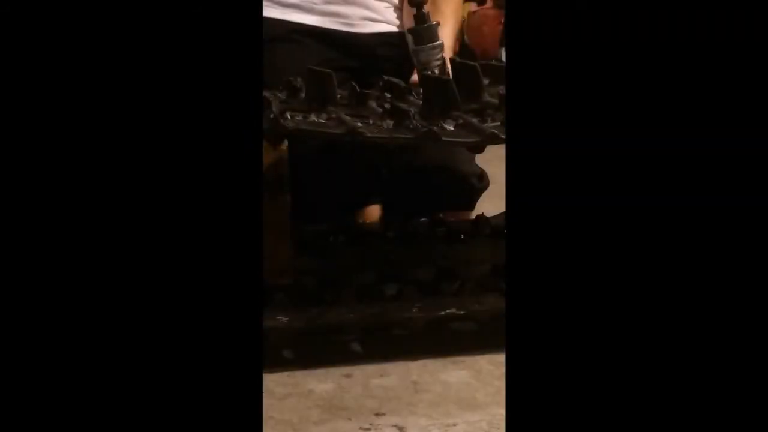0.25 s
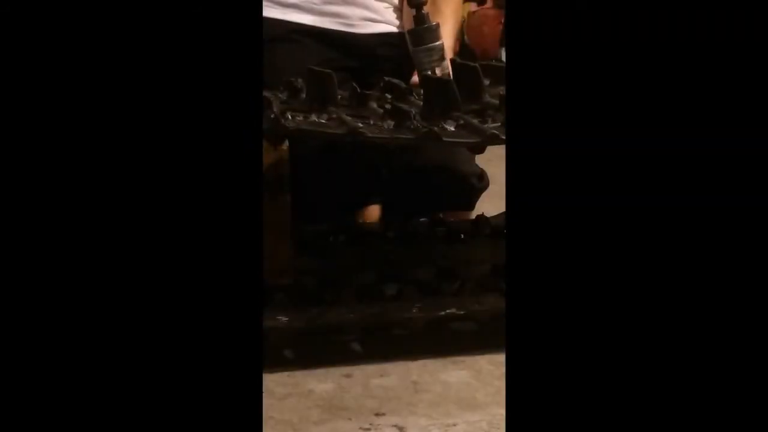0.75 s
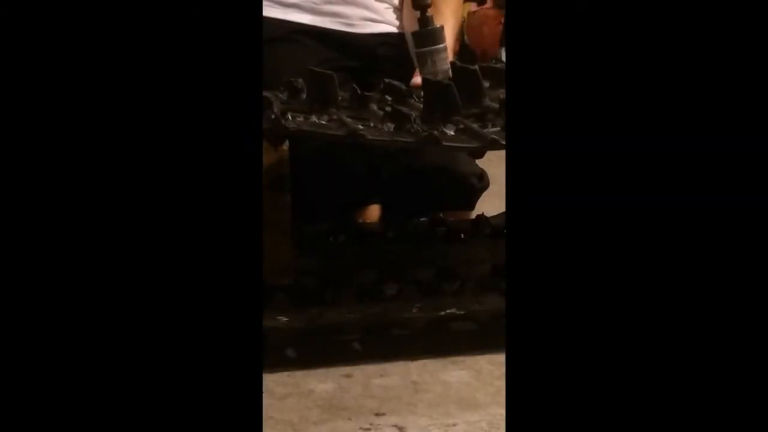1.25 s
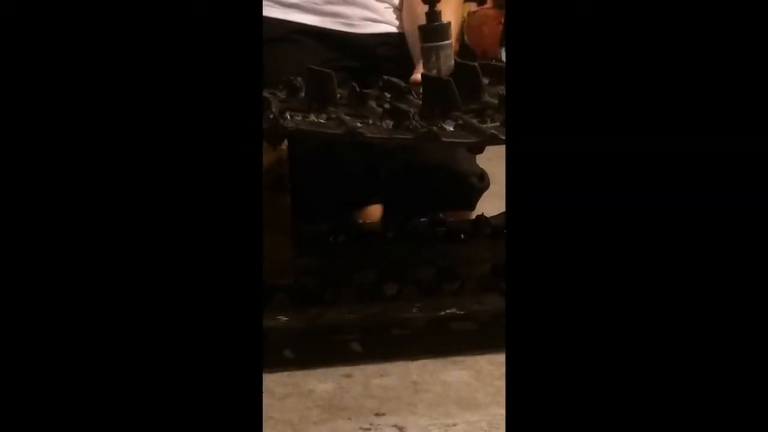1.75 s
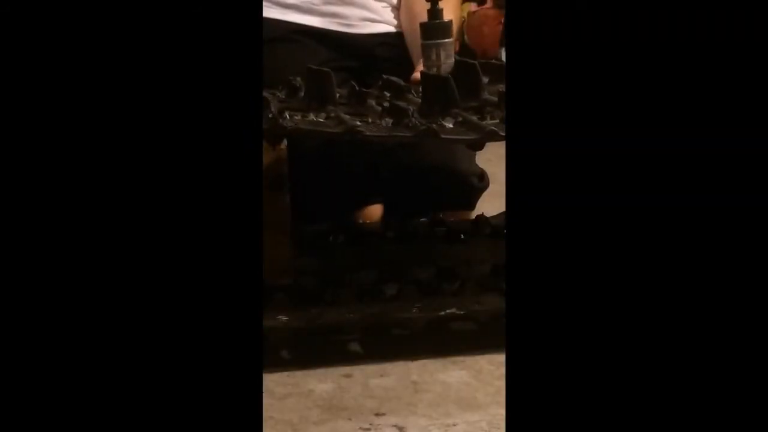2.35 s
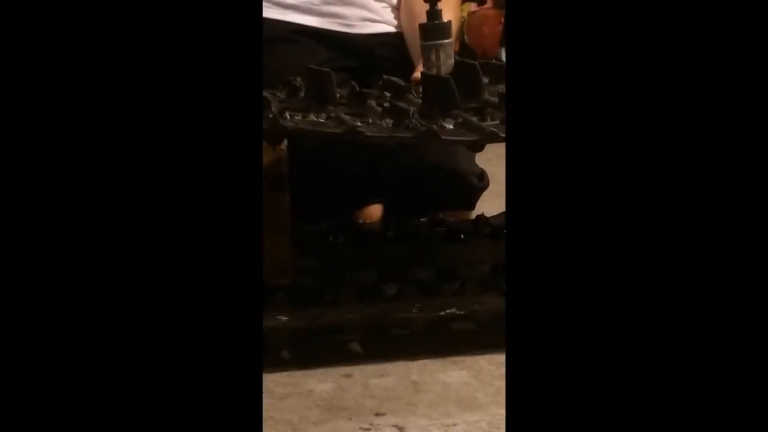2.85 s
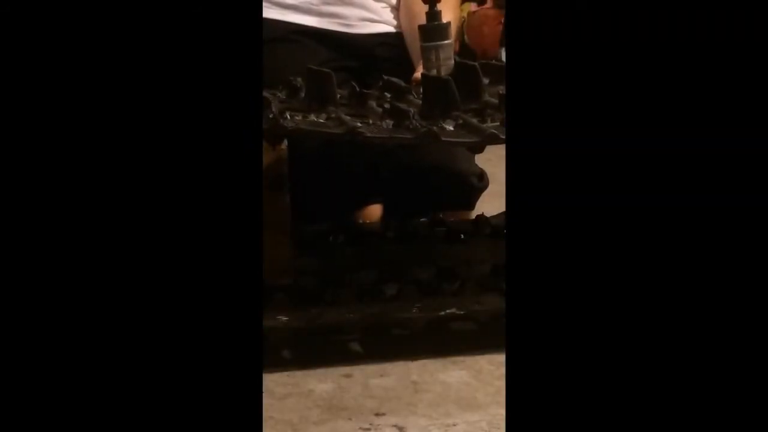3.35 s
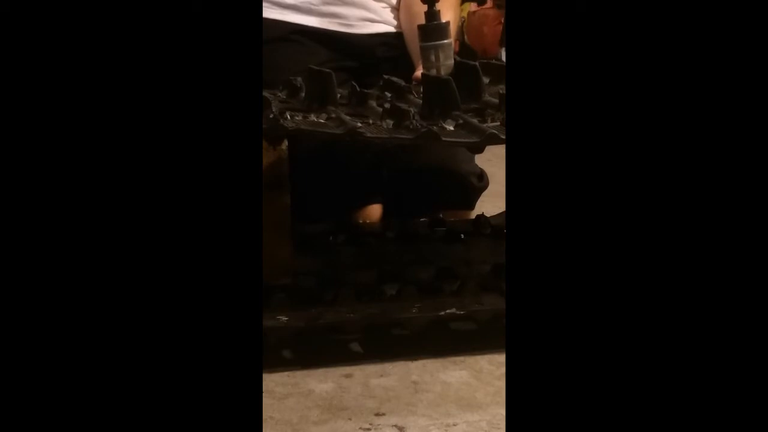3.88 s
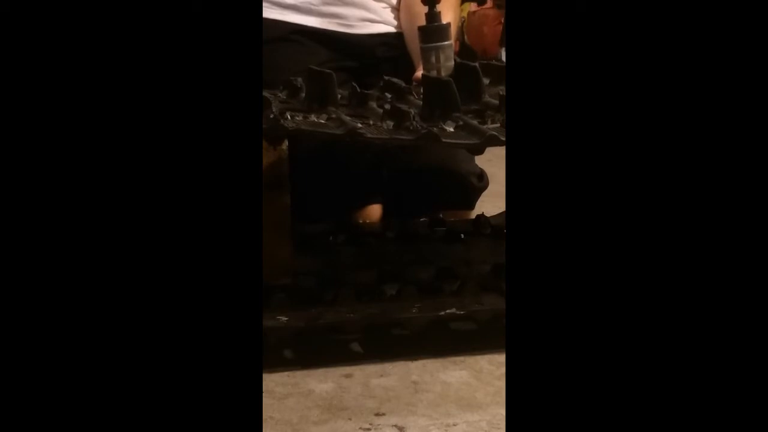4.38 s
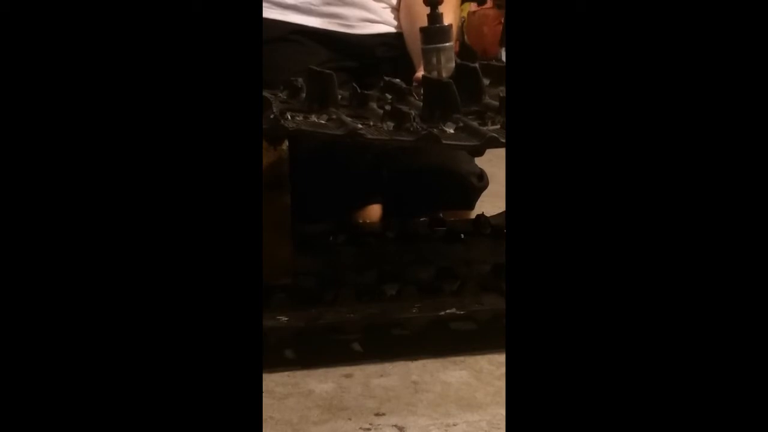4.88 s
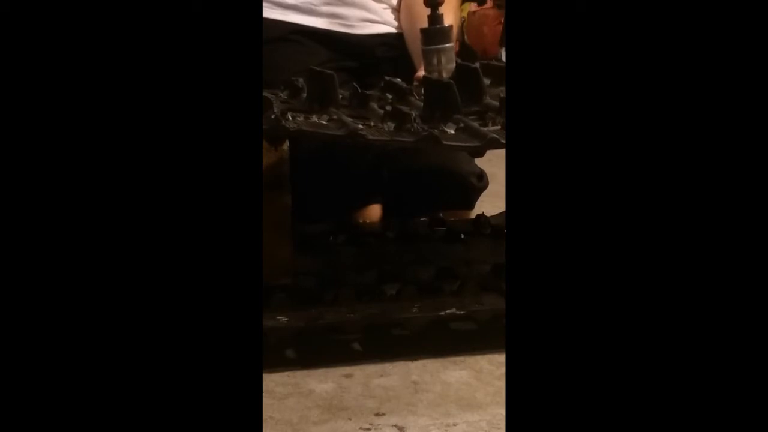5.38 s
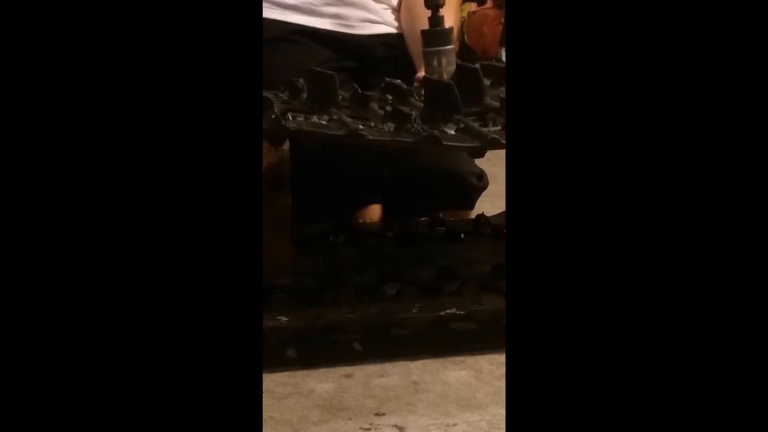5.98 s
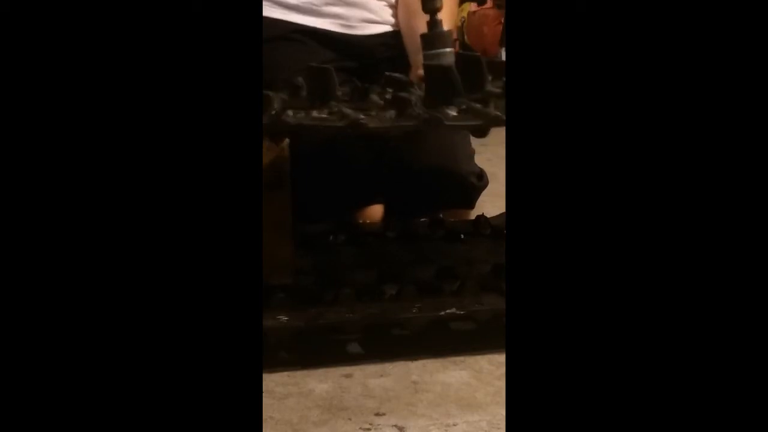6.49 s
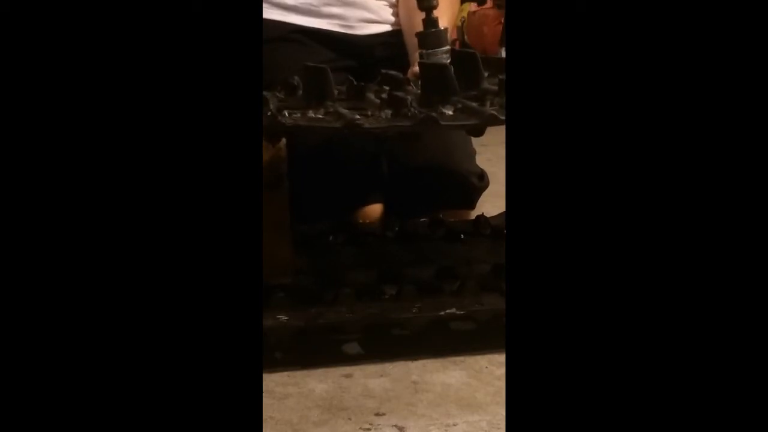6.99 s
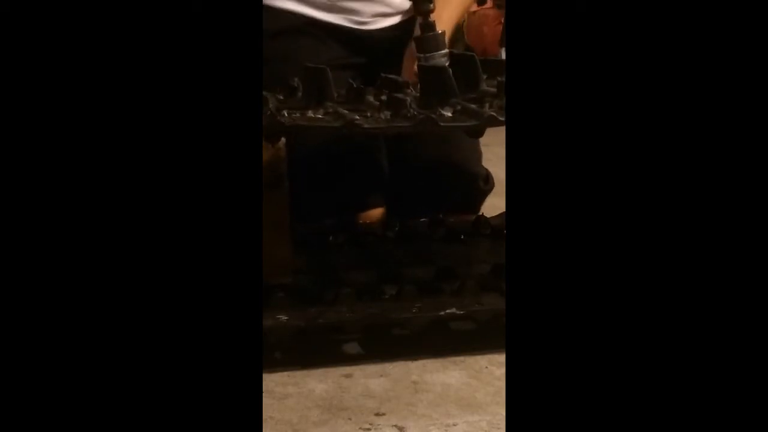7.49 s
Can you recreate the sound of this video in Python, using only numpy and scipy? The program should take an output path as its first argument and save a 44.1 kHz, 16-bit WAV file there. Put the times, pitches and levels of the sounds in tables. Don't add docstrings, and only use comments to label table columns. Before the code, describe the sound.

In a workshop, a low distant machine hum and insect-like hiss sit under a close drill, brighter on the left. From 0 to 0.6 s the motor barely turns, giving uneven dry gear jolts. From 0.6 to 2 s a rapid ratcheting, about sixty pulses a second, thickens as pitch climbs. From 2 to 5 s the chattering whine rises in steps, louder, with gear rattle, hissing brush sparks and short metallic rings as the saw teeth catch in thick rubber. About 5.2 s full trigger smooths the chatter and the motor surges into a fast, loud whine, sagging slightly from 5.9 s as the saw binds. At 6.4 s it cracks through; gears grind and groan downward, stopping by 7 s. Tiny ticks at 7.03 and 7.2 s, then at 7.6 s a bench clunk with a brief jingling steel ring.

```python
import sys
import numpy as np
from scipy import signal
from scipy.fft import rfft, irfft, next_fast_len
from scipy.io import wavfile
from scipy.ndimage import uniform_filter1d, map_coordinates

SR = 44100
rng = np.random.default_rng(int(sys.argv[2]) if len(sys.argv) > 2 else 0)


def to_linear_factor(level_db):
    exponent = np.asarray(level_db, float) / 20
    return 10 ** exponent


def wav_record(signal):
    frames = np.transpose(np.atleast_2d(signal))
    bounded = np.clip(frames, -1, 1)
    quanta = np.round(bounded * 32767).astype(np.int16)
    wavfile.write(sys.argv[1], SR, quanta)


N = 341025
T = np.arange(N) / SR
MAINS_HZ = 60.08


def unit(x):
    return x / np.sqrt(np.mean(x ** 2) + 1e-20)


def along(points, hz):
    f, v = np.transpose(points)
    return np.interp(np.log(hz + 1), np.log(f + 1), v)


def curves(rows):
    s, *cols = np.transpose(rows)
    return [np.interp(T, s, c) for c in cols]


def wobble(rate):
    knots = rng.standard_normal(int(N * rate / SR) + 4)
    return map_coordinates(knots, [np.arange(N) * rate / SR])


def bumps(rows, span):
    t = np.arange(0, N / SR + .01, .005)
    swell = sum(size * np.exp(-((t - s) / span) ** 2) for s, size in rows)
    return curves(np.transpose([t, swell]))[0]


def swell_db(s, span):
    return -9 * ((T - s) / span) ** 2


def filtered(x, response):
    m = next_fast_len(N + SR // 2)
    return irfft(rfft(x, m) * response(np.fft.rfftfreq(m, 1 / SR)), m)[..., :N]


def modes(table):
    return lambda f: sum((-1) ** k * to_linear_factor(db) * 1j * f * w / (c * c - f * f + 1j * f * w)
                         for k, (c, w, db) in enumerate(table))


def tone(phase, db):
    return np.sqrt(2) * to_linear_factor(db + .8 * wobble(10)) * np.sin(phase + 6 * rng.random())


def wandering(hz):
    return 2 * np.pi * np.cumsum(hz) / SR


LULL_TIMES = (3.95, 4.5, 5.9, 6.15)
# (time [s], level [dB])
SURGES = [
    (.54, 1),
    (1.15, 3),
    (2.1, -7),
    (3.64, -3),
    (4.24, 4),
    (6.82, 3),
    (7.34, 5.5),
]


def drone_db():
    surge_db = bumps(SURGES, .07) + wobble(2)
    return surge_db, np.interp(T, LULL_TIMES, [0, -11, -11, 0])


# (frequency [Hz], width [Hz], level [dB])
HUM = [(48.8, 7.3, -56), (74, 37, -57), (104, 11, -56), (227, 10, -75.5), (5270, 130, -61),
       (4750, 400, -67.5), (30, 20, -71.5)]
# (frequency [Hz], level [dB])
MACHINE = [(49, -57), (106.4, -61)]
# (frequency [Hz], level [dB per Hz])
HISS = [(76, -34.5), (130, -11.5), (162, -11), (211, -15.5), (1170, -26), (4070, -31), (5180, -23.5),
        (5730, -32.5), (16000, -35.5)]


def floor():
    shared, own = rng.standard_normal(N), rng.standard_normal((2, N))
    hum = lambda f: sum(to_linear_factor(db) / np.sqrt(w) / (1 + ((f - c) / w * 2) ** 2) for c, w, db in HUM)
    alike = lambda f: 1 / (1 + (f / 350) ** 2)
    mixed = filtered(shared, alike) + filtered(own, lambda f: np.sqrt(1 - .96 * alike(f) ** 2))
    drone = to_linear_factor(40.5) * filtered(mixed, hum) * to_linear_factor([[1.2], [-1.2]])
    steady = sum(np.sqrt(2) * to_linear_factor(db + 1.3 * wobble(3.5)) * np.sin(wandering(hz + 0.82 * wobble(6.4)))
                 for hz, db in MACHINE)
    drone = drone + steady * to_linear_factor([[1.4], [-1.4]])
    for change_db, below_hz in zip(drone_db(), (150, 66)):
        drone = drone + (to_linear_factor(change_db) - 1) * filtered(drone, lambda f: f < below_hz)
    hiss = unit(filtered(rng.standard_normal((2, N)), lambda f: to_linear_factor(along(HISS, f))))
    return drone + to_linear_factor(-60.0) * hiss


# (frequency [Hz], t60 [s])
ROOM = [(200, 1), (600, 0.4), (2000, 0.48), (8000, 0.35), (15000, 0.42)]


def room(x):
    hz, t, z = signal.stft(rng.standard_normal((2, SR // 2)), SR, nperseg=256)
    tail = signal.istft(z * to_linear_factor(-60 * t / along(ROOM, hz)[:, None]), SR, nperseg=256)[1]
    tail = tail / np.linalg.norm(tail[0])
    return signal.fftconvolve(np.pad(x, (700, 0))[None], tail, axes=1)[:, :N]


# (time [s], peak level [dB], thud [dB], tick [dB], t60 [s])
KNOCKS = [
    (6.418, -13.5, -19, -18, 0.045),
    (7.031, -47.5, -16, -7.5, 0.022),
    (7.199, -53, -17, -17, .043),
    (7.618, -39, -9, -34, 0.034),
    (7.6235, -31.5, -22, -16.5, 0.036),
    (7.635, -33, -14.5, -16.5, 0.041),
]
# (time [s], level [dB])
CLACKS = [
    (6.4171, -3),
    (7.6272, -18.5),
    (7.634, -27),
]
# (frequency [Hz], width [Hz], level [dB])
BENCH = [(900, 900, -2), (1800, 450, 1), (2700, 1300, 0), (4500, 2500, -12)]
# (frequency [Hz], width [Hz], level [dB])
FITTINGS = [(5320, 500, -9), (6900, 500, -2), (8060, 200, -5), (8780, 60, -4), (11000, 3000, -11)]
# (frequency [Hz], width [Hz], level [dB])
HOUSING = [(2450, 420, 0), (3350, 500, 0)]


def knocks():
    crack, tick, thud = np.zeros(N + SR), np.zeros(N + SR), np.zeros(N)
    t = np.arange(SR // 8) / SR
    for s, db, thud_db, tick_db, t60 in KNOCKS:
        shape = (1 - np.exp(-t / 0.00051)) * to_linear_factor(db - 60 * t / max(t60, .005))
        burst = shape * rng.standard_normal((2, len(t)))
        start = round(s * SR)
        crack[start:][:len(t)] += burst[0]
        tick[start:][:len(t)] += to_linear_factor(tick_db) * burst[1]
        thud[start] = to_linear_factor(db + thud_db + 47.0)
    ring = to_linear_factor(12.5) * filtered(crack[:N], modes(BENCH)) + to_linear_factor(26.5) * filtered(tick[:N], modes(FITTINGS))
    edges = np.bincount([round(s * SR) for s, db in CLACKS], [to_linear_factor(db + 23.0) for s, db in CLACKS], N)
    heavy = modes([(129, 20, -7.5), (262, 36.0, 6.0), (350.0, 24, 9.0), (594, 200, -8)])
    return ring + filtered(edges, modes(HOUSING)) + filtered(thud, heavy)


# (frequency [Hz], level [dB], t60 [s])
CHUCK = [(1823, -2.5, .12), (1960, -4.5, .35), (2541, -10, .31), (2794, -10.5, .23), (8010, -8, .07),
         (8800, -19, .3)]


def chuck():
    out, t = np.zeros(N + SR), np.arange(SR // 4) / SR
    for s, db in CLACKS[1:]:
        for hz, level, t60 in CHUCK:
            phase = 2 * np.pi * hz * t + rng.normal(0, .04, len(t)).cumsum()
            out[round(s * SR):][:len(t)] += to_linear_factor(db - 17 + level - 60 * t / t60) * np.sin(phase)
    return out[:N]


def mains():
    return 2 * np.pi * (MAINS_HZ * T - .6)


FULL_S, THROUGH_S = 5.24, 6.41
# (time [s], speed [turns Hz])
SPEED = [(0, 20), (.5, 38), (.69, 52), (.86, 60), (.96, 72), (1.29, 95), (1.9, 123), (2.1, 153.3),
         (2.28, 165), (2.42, 165.7), (2.58, 178), (2.9, 186), (3.6, 191), (3.7, 207), (3.87, 224),
         (4.25, 237), (4.6, 241.2), (5.02, 241.3), (5.12, 252.5), (5.24, 266)]
# (time [s], speed [turns Hz])
BRAKING = [(6.4, 333), (6.42, 322), (6.45, 283), (6.48, 256), (6.51, 240), (6.56, 227), (6.63, 235.5),
           (6.685, 240.5), (6.705, 228), (6.73, 204), (6.79, 156), (6.9, 60)]


def speed():
    full = 351.5 - (351.5 - SPEED[-1][1]) * np.exp(-(T - FULL_S) / .15)
    full = full - 62 * np.clip(T - 5.9, 0, 1) ** 2
    running = np.where(T < BRAKING[0][0], full, curves(BRAKING)[0])
    return np.where(T < FULL_S, curves(SPEED)[0], running)


def stages():
    braked = np.clip((T - THROUGH_S) / .04 + .5, 0, 1)
    return np.clip((T - FULL_S + .07) / .2, 0, 1) * (1 - braked), braked


# (time [s], level [dB])
EFFORT = [(0, -48.5), (.2, -49.5), (.41, -44.5), (.49, -50), (.58, -41), (.8, -37), (1.6, -35), (2.5, -31),
          (3.65, -30.5), (3.84, -28), (5.05, -26.5), (5.28, -24), (6.06, -21.5), (6.41, -22.5),
          (6.45, -25.5), (6.69, -25), (6.82, -32), (7.0, -65)]
# (time [s], peak level [dB], body level [dB])
JOLTS = [(0.0734, -34.5, 4.5), (0.0939, -32, 0), (0.11, -34.5, -0.5), (.124, -43, 7), (.16, -38, 4.5),
         (.176, -35, 3.5), (0.1923, -30.5, -1), (0.21, -29, 0.5), (.244, -29.5, -2), (0.2572, -28, 1.5),
         (0.291, -33.5, -3), (0.311, -31.5, -1), (0.361, -34, 1.5), (0.392, -27, -2.5), (.41, -22.5, -6.5),
         (.444, -38.5, 3), (.476, -37, 1), (0.5279, -30.5, 1.5), (0.5445, -26.5, -0.5),
         (0.5567, -24.5, -3.5), (.577, -29.5, -1), (0.5936, -23, -12), (0.627, -29.5, -3.5),
         (0.656, -26, 0), (.676, -24.5, -15), (0.694, -26, -2.5), (0.726, -20, -8), (0.742, -20, -5),
         (0.7736, -19.5, -8), (.792, -24.5, -3.5), (.8258, -24, -5.5), (0.843, -22, -5.5),
         (0.8918, -23, -17), (.9393, -34, -7.5), (.908, -25, -5.5), (1.055, -29.5, -2.5),
         (1.0888, -26.5, -15), (1.177, -20.5, -7.5), (1.2074, -27, -1.5), (1.2437, -25, -8),
         (1.2758, -25, -6), (1.327, -25.5, -6), (1.37, -23.5, -5.5), (1.544, -23.5, -2.5)]


def jolts():
    bright, body, t = np.zeros(N), np.zeros(N), np.arange(SR // 30) / SR
    pulses = (np.arange(int(.6 * MAINS_HZ), int(2.05 * MAINS_HZ)) + .55) / MAINS_HZ
    sizes = np.interp(pulses, *zip(*EFFORT)) + 0.5 + 1.5 * rng.standard_normal(len(pulses))
    ratchet = [(s, db, 1.5) for s, db in zip(pulses, sizes)]
    for s, db, body_db in list(JOLTS) + ratchet:
        decay = to_linear_factor(db - 60 * t / 0.027) + to_linear_factor(db + 2.5 - 60 * t / 0.0054)
        burst = (1 - np.exp(-t / 0.00087)) * decay * np.sign(rng.standard_normal((2, len(t))))
        start = round(s * SR)
        bright[start:][:len(t)] += burst[0]
        body[start:][:len(t)] += to_linear_factor(body_db - 3.5) * burst[1]
        body[round((s + .001) * SR)] += to_linear_factor(db + body_db + 11.5)
    sparks = to_linear_factor(4.0) * filtered(bright, lambda f: modes([(7500, 7000, 0)])(f) ** 2)
    gearbox = modes([(513, 460, -10.0), (1200, 340, -1.0), (2490, 1000, -2.0), (3050, 560, 2.0),
                     (3640, 32, -7.5)])
    return sparks + to_linear_factor(15.5) * filtered(body, gearbox)


def throb():
    hz, (full, braked) = speed(), stages()
    depth_db = (1 - braked) * 13 * np.exp(-hz / 110) - full
    depth_db = depth_db * np.interp(T, [.05, .1, .55, .62], [0, .5, .5, 1])
    pulse = np.exp(1.5 * (np.cos(mains() + 0.68 * np.cos(mains())) - 1))
    pulse = pulse * (1 + 0.3 * wobble(60))
    beat_db = 1.54 * depth_db * (pulse - pulse.mean()) + 0.4 * np.sin(wandering(hz))
    shared_db = 0.32 * wobble(11.0) + 0.21 * wobble(35)
    return beat_db, shared_db, 1.5 * (1 - full)


def rattle(depth, throbbing, response):
    beat_db, shared_db, grain_db = throbbing
    gain = to_linear_factor(depth * beat_db + shared_db + grain_db * wobble(900) + 0.88 * wobble(40))
    noise = rng.standard_normal(N) * gain / np.sqrt(np.abs(uniform_filter1d(gain ** 2, size=8000)))
    return unit(filtered(noise, response))


# (frequency [Hz], width [Hz], level [dB])
FAN = [(6580, 450, 10.5), (7970, 160, 10), (9040, 290, -3.5), (10600, 500, -18.5)]


def fan(throbbing):
    return to_linear_factor(-22 + 117 * np.log10(speed() / 350)) * rattle(.2, throbbing, modes(FAN))


# (frequency [Hz], width [Hz], level [dB], time [s], lasting [s])
GRINDS = [
    (2720, 70, -26, 6.468, .03),
    (2125, 140, -35, 6.785, .04),
    (2440, 200, -32, 6.76, .04),
    (2750, 150, -31, 6.57, .025),
]


def braking_gears(throbbing):
    grind = sum(to_linear_factor(db + swell_db(s, span)) * rattle(0, throbbing, modes([(c, w, 0)]))
                for c, w, db, s, span in GRINDS)
    slow = stages()[1] * np.clip(1 - speed() / 180, 0, 1)
    return grind + slow * to_linear_factor(curves(EFFORT)[0] + 2.5) * rattle(.2, throbbing, modes([(448, 280, 0)]))


# (frequency [Hz], width [Hz], level [dB])
WALL = [(3587, 24, -3), (1105, 29, -12), (817, 22, -11)]
# (frequency [Hz], width [Hz], level [dB])
RIM = [(4883, 18, 8), (9830, 31, -22.5)]
# (time [s], cup level [dB], rim level [dB])
CATCHES = [(.13, -4, -5), (.28, 13, 5), (.33, 4, -4), (.4, 13, -1), (.49, 0, -8), (.6, 10.5, 11.5),
           (.7, 11.5, 9), (.84, 9, 2), (.98, 7, 5.5), (1.1, 9, -5), (1.31, 6, -5), (1.48, 0, 5),
           (1.58, 5, -4), (1.85, 3.5, 2.5), (2.03, -3.5, 2.5), (2.17, 2.5, -4.5), (2.55, -11, 4),
           (2.67, 6, 7.5), (2.77, 10.5, 5), (3.3, 3, 1), (3.38, 5.5, 5), (3.52, 7, 1), (3.71, 13, -1.5),
           (4.065, 11, 5.5), (4.18, 3, 6.5), (4.29, 9.5, -1), (4.39, -5, 5), (4.615, 7, 10), (4.7, 7, 2),
           (4.78, 4, 10), (4.95, 3.5, 6.5), (5.05, 1.5, 6.5), (5.35, 6, -1), (5.75, 7, 1.5),
           (6.05, -6, -2.5), (6.15, 1, 1), (6.3, 5, 4.5), (6.395, 0.5, 12.5)]


def saw(throbbing):
    effort_db, braked = curves(EFFORT)[0], stages()[1]
    at, cup, edge = np.transpose(CATCHES)
    catch_s = 0.028
    wall_db = effort_db - 13.5 + bumps(zip(at, cup), catch_s) + wobble(8) - 13 * braked
    rim_db = effort_db - 10.5 + bumps(zip(at, edge), catch_s) + wobble(8)
    rim_db = rim_db + 1.5 * (wobble(30) - 1) - 12 * braked

    def ringing(table, depth):
        clear = .82
        held = np.sqrt(2) * np.sin(wandering(table[0][0] + 8 * wobble(40)))
        return clear * held + np.sqrt(1 - clear ** 2) * rattle(depth, throbbing, modes(table))

    return to_linear_factor(wall_db) * ringing(WALL, 0.6) + to_linear_factor(rim_db) * ringing(RIM, 0.45)


# (frequency [Hz], level [dB per Hz])
BRUSHES = [(2240, -37), (3800, -2), (5160, -5.5), (5650, -4), (7190, -3.5), (7960, -3), (9830, -1.5),
           (11200, -3), (16000, -19.5)]
# (frequency [Hz], width [Hz], level [dB])
VENTS = [(5550, 300, 2), (6700, 220, 2), (7750, 260, 6), (8600, 400, 6), (9750, 200, -1), (11420, 200, 8)]
# (time [s], level [dB], half length [s])
SPARK_LULL = (5.12, -2.5, 0.14)
# (frequency [Hz], width [Hz], level over the sparks [dB])
SLOW_VENT = (8050, 260, -9)


def brushes(throbbing):
    hz, (full, braked) = speed(), stages()
    level_db = curves(EFFORT)[0] + 7 - 17.5 * np.exp(-hz / 55.6) - 1.5 * braked
    level_db = level_db + bumps([SPARK_LULL[:2]], SPARK_LULL[2])
    vents = lambda f: to_linear_factor(along(BRUSHES, f)) * (1 + np.abs(modes(VENTS)(f)))
    sparks = rattle(0.64, throbbing, vents)
    dull = np.clip(1.1 - hz / 260, 0, .8) * filtered(sparks, lambda f: 1 / (1 + (12000 / (f + 1)) ** 8))
    choked = .5 * (full + braked) * filtered(sparks, lambda f: 1 / (1 + ((f - 11420) / 400) ** 2))
    c, w, vent_db = SLOW_VENT
    singing = np.clip(1 - hz / 200, 0, 1) * to_linear_factor(vent_db) * rattle(.4, throbbing, modes([(c, w, 0)]))
    return to_linear_factor(level_db) * (sparks - dull - choked + singing)


# (frequency [Hz], level [dB per Hz])
GEARS = [(120, -26), (135, -25.5), (235, -20), (359, -13.5), (390, -18.5), (617, -13), (1060, -2),
         (1570, -6), (1800, -6.5), (2050, -1.5), (2440, -5), (3670, 0.5), (4050, -13), (4770, -5),
         (6000, -10.5), (7800, -34.5), (13200, -120)]


def gears(throbbing):
    box = modes([(1150, 350, -1), (2450, 500, 0), (3150, 400, -3), (400, 180, -2)])
    lumps = lambda f: to_linear_factor(along(GEARS, f)) * (1 + np.abs(box(f)))
    return to_linear_factor(curves(EFFORT)[0] + 2.5) * rattle(0.65, throbbing, lumps)


def tool_noise():
    throbbing = throb()
    on = np.interp(T, [6.93, 7.02], [1, 0])
    motor = gears(throbbing) + brushes(throbbing) + fan(throbbing)
    return on * (motor + saw(throbbing) + braking_gears(throbbing))


# (multiple of the turns, level [dB], time [s], lasting [s])
STRAIN = [(6, -40, 6.64, .07), (7, -39, 6.63, .06), (12, -22.5, 6.52, .05), (11, -29, 6.47, .04),
          (12, -31, 6.76, .04), (5, -36, 6.6, .08), (9, -27, 5.3, .05)]
# (frequency [Hz], level [dB], time [s], lasting [s])
SHUDDER = (260.5, -41, 6.58, 0.13)


def strain(turn):
    groan = sum(tone(k * turn, db + swell_db(s, span)) for k, db, s, span in STRAIN)
    hz, db, s, span = SHUDDER
    return groan + tone(wandering(hz + 9 * wobble(30)), db + swell_db(s, span))


# (chopped [dB], spinning up [dB], braked [dB])
SIDEBANDS = [(-22, -14, -27), (-21.5, -8.5, -25), (-15.5, -5, -16), (-5, -5, -14.5), (-3, -1.5, 0.5),
             (-5.5, -8, -12), (-4.5, -9, 1.5), (-3.5, -14, -16), (-8, -20, -22)]


def slot_whine(turn, level_db, braked):
    rising = np.interp(T, [5.03, 5.2], [0, 1]) * (1 - braked)
    whine = 0
    for k, (chop_db, rise_db, brake_db) in enumerate(SIDEBANDS):
        side_db = (1.5 - rising - braked) * chop_db + rising * rise_db + braked * brake_db + wobble(7)
        phase = 10 * turn + (k - 4) * mains() + .15 * (k - 5) ** 2 + .25 * wobble(5)
        whine = whine + np.sqrt(2) * to_linear_factor(level_db + side_db) * np.sin(phase)
    return whine


# (speed [turns Hz], unbalance [dB], gear order 4 [dB], slot order 10 [dB], bar order 20 [dB])
ORDERS_BY_SPEED = [(65, -80, -70, -70, -70), (95, -74, -59, -70, -66), (125, -70, -59, -62, -55),
                   (157, -64, -62, -56, -38), (170, -63, -60, -50, -41), (186, -60, -56, -46, -46),
                   (210, -58, -53, -41, -41), (236, -52, -46, -31, -39), (242, -50, -43, -25.5, -41),
                   (252, -48, -43, -22, -42), (270, -43, -42, -19, -44), (316, -37, -42, -26, -40),
                   (334, -33, -41, -38, -34), (348, -29.8, -41, -40, -27)]
BRAKED_DB = [-48, -31, -25.5, -52]
# (time [s], level [dB])
BRAKED_GEAR = [
    (6.42, 8),
    (6.475, 3),
    (6.54, -10),
    (6.605, 2),
    (6.67, -3),
    (6.74, 1),
]
# (time [s], level [dB])
BRAKED_WHINE = [
    (6.435, -11),
    (6.585, -3),
    (6.66, 2),
    (6.76, -12),
]


def rotor():
    hz, (full, braked) = speed(), stages()
    at, *levels = np.transpose(ORDERS_BY_SPEED)
    fade_db = .4 * np.clip(215 - hz, 0, None)
    shaft_db, gear_db, slot_db, bar_db = (
        (1 - braked) * np.interp(hz, at, db) + braked * (held - fade_db)
        for db, held in zip(levels, BRAKED_DB))
    shaft_db = shaft_db - 9 * full * np.clip(T - 6.0, 0, 1)
    gear_db = gear_db + bumps(BRAKED_GEAR, .035)
    slot_db = slot_db + bumps(BRAKED_WHINE, .035) + 1.5 * wobble(90)
    turn = wandering(hz * (1 + .001 * wobble(25)))
    chopped = np.interp(T, [5.02, 5.12, 5.4], [1, .42, .12])
    shaft = tone(turn, shaft_db) + tone(2 * turn, shaft_db - 3 - 22 * (1 - chopped))
    spindle = chopped ** 2 * tone(.357 * turn, shaft_db - 7)
    teeth = tone(4 * turn, gear_db) + slot_whine(turn, slot_db, braked) + tone(20 * turn, bar_db)
    buzz_db = 2.0 * wobble(17) + curves(EFFORT)[0] - 27.5 - 22 * (full + braked)
    buzz = tone(6 * mains(), buzz_db) + tone(5 * mains(), buzz_db - 5)
    return (T < 6.9) * (shaft + spindle + teeth + strain(turn) + buzz)


# (frequency [Hz], share [0-1])
DIRECT = [(100, .97), (400, .99), (750, .75), (1300, .88), (1900, .3), (2500, .55), (3500, .1),
          (12000, .08)]
# (frequency [Hz], left-right level [dB])
SHADOW = [(60, 1), (92, 1.5), (140, -1.5), (210, 5), (330, 5.5), (500, 0), (770, 0.5), (1170, 0),
          (1600, -1), (1790, 0), (2740, 7.5), (4190, 5.5), (6410, 15), (9810, 33), (15000, 4)]


def scene():
    tool = rotor() + tool_noise() + jolts() + knocks() + chuck()
    wet = room(tool)
    near = tool + to_linear_factor(-11.5) * filtered(wet[0], lambda f: 1 / (1 + (500 / (f + 1)) ** 4))
    share = lambda f: np.clip(along(DIRECT, f), 0, .99)
    late = filtered(tool, lambda f: share(f) * np.exp(-2j * np.pi * f * 14 / SR))
    far = late + filtered(wet[1], lambda f: np.sqrt(1 - share(f) ** 2))
    return np.array([near, filtered(far, lambda f: to_linear_factor(-along(SHADOW, f)))]) + floor()


def low_pass(x):
    return signal.sosfilt(signal.butter(12, 15860, fs=SR, output="sos"), x)


def record(dry):
    soft = dry / (1 + np.abs(dry / .95) ** 4) ** .25
    mix = filtered(soft, lambda hz: hz < 15860)
    return low_pass(mix)


dry = scene()
out = record(dry)
wav_record(out)
```